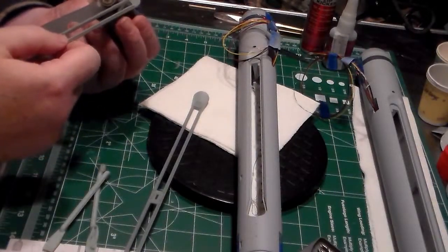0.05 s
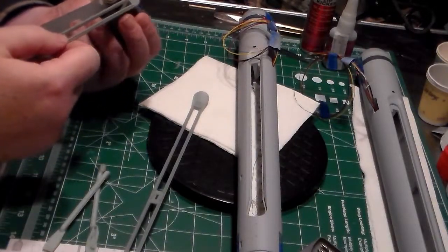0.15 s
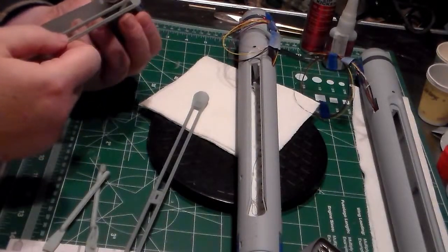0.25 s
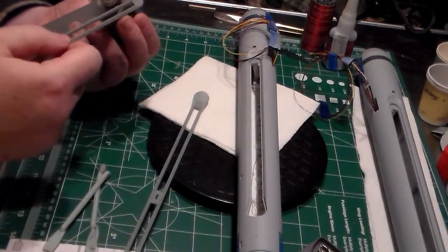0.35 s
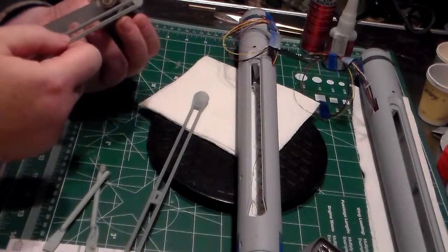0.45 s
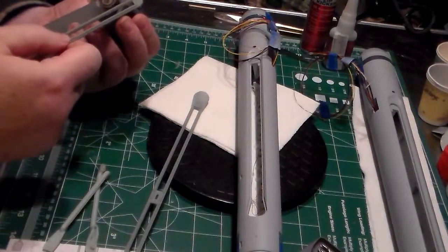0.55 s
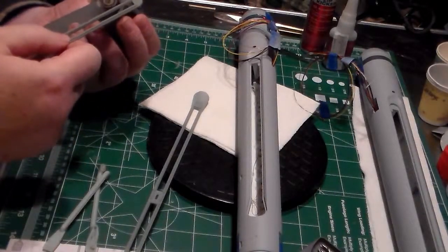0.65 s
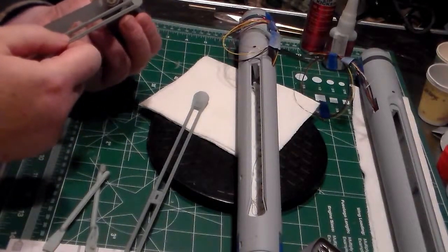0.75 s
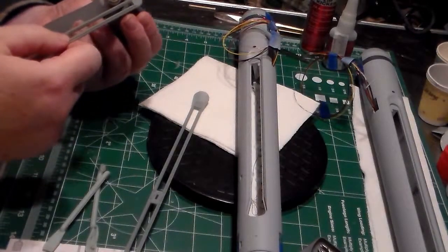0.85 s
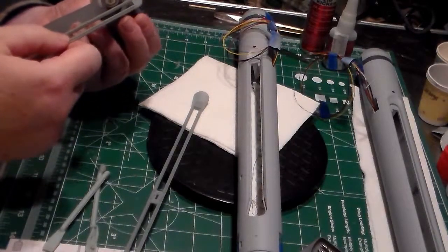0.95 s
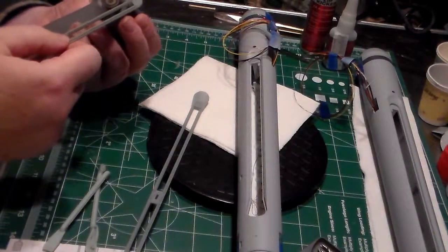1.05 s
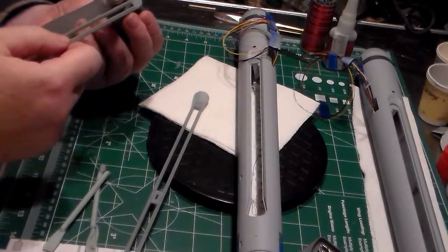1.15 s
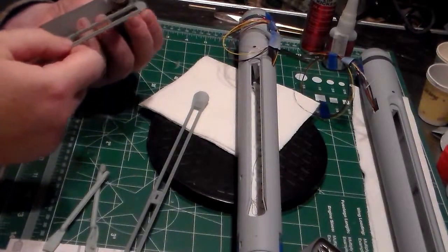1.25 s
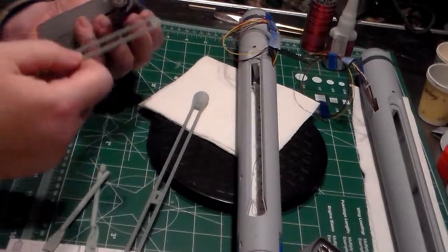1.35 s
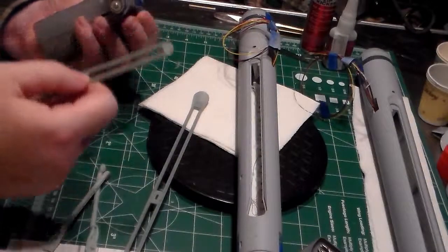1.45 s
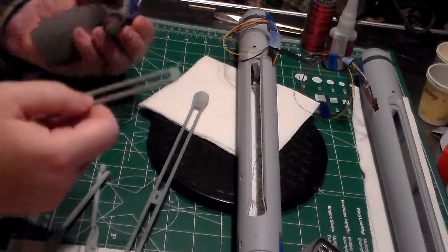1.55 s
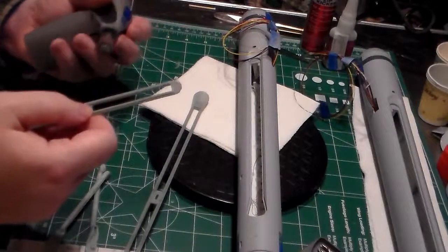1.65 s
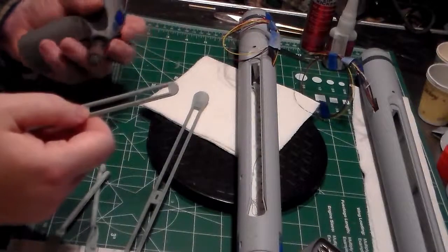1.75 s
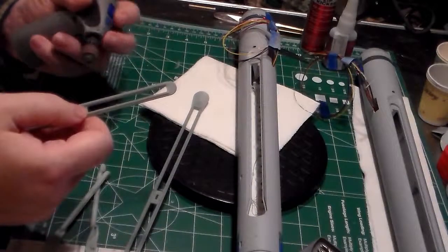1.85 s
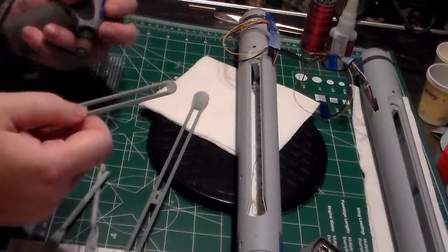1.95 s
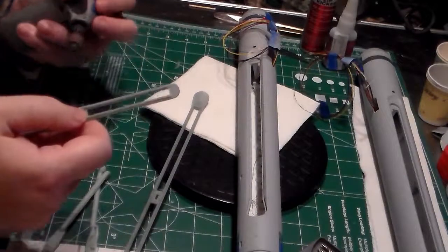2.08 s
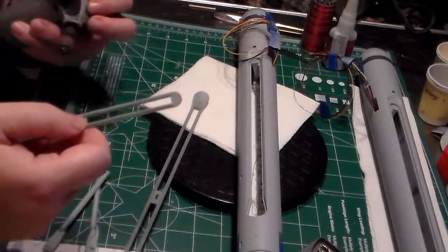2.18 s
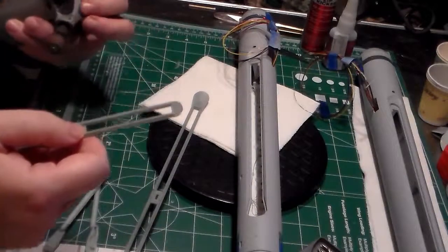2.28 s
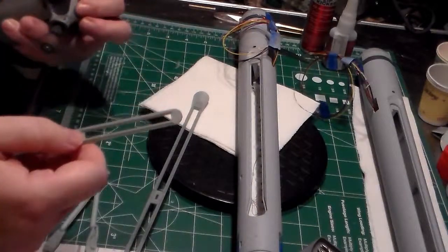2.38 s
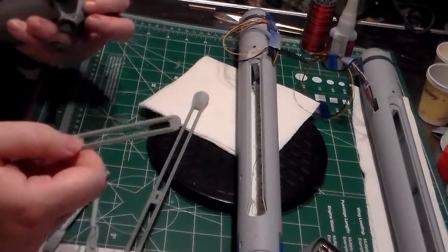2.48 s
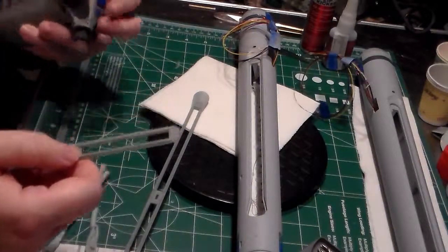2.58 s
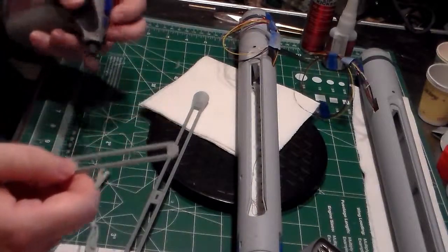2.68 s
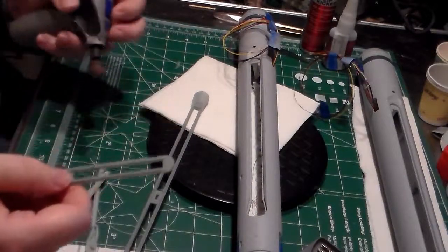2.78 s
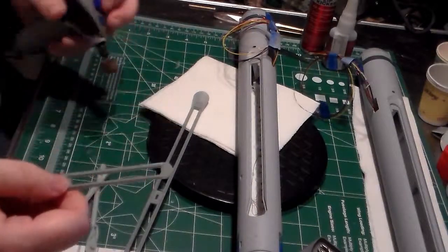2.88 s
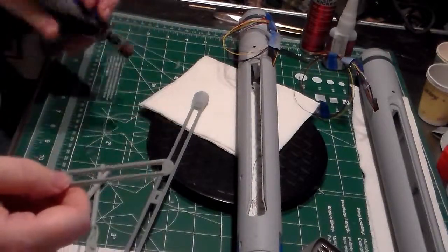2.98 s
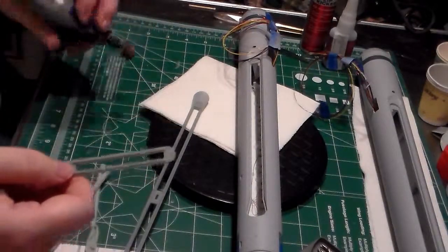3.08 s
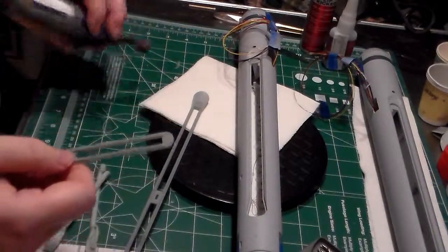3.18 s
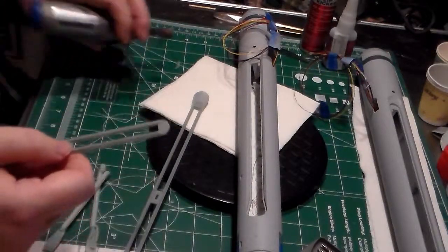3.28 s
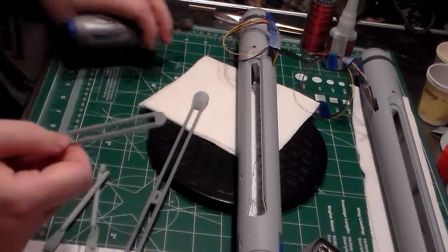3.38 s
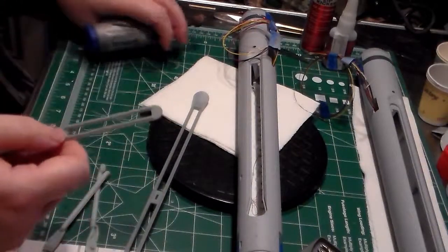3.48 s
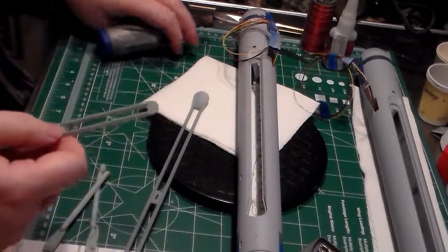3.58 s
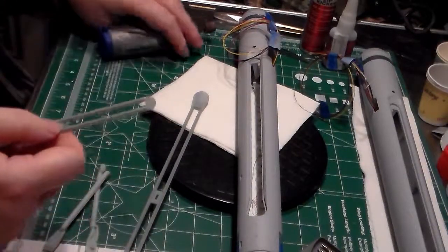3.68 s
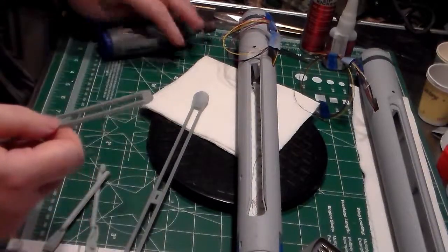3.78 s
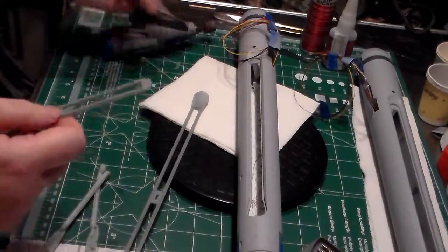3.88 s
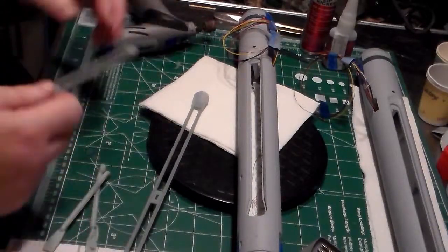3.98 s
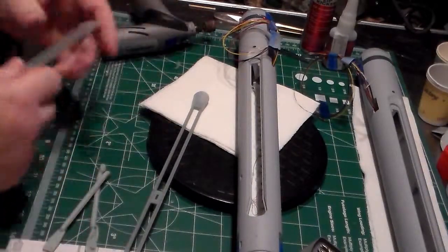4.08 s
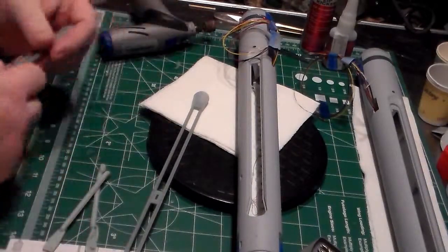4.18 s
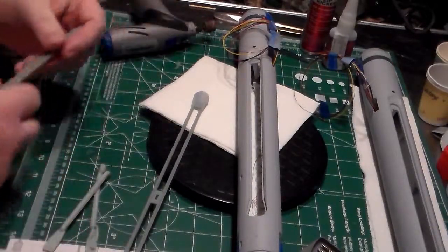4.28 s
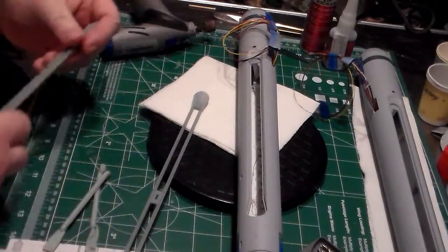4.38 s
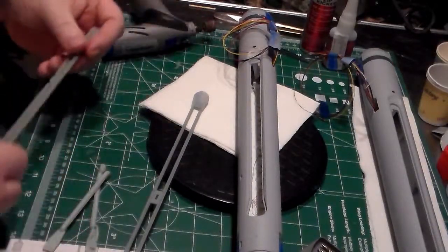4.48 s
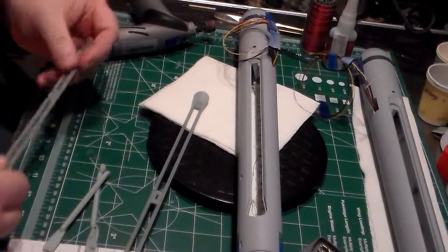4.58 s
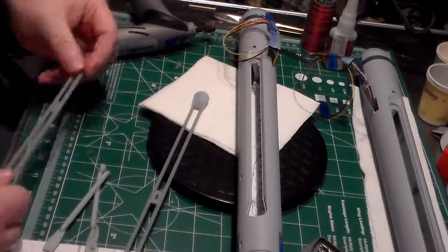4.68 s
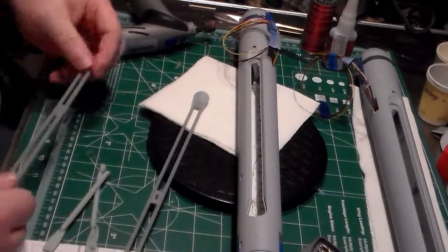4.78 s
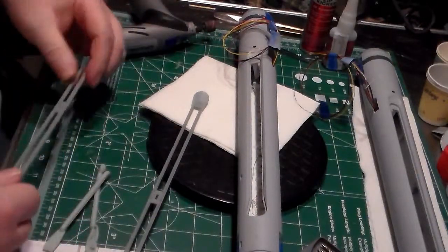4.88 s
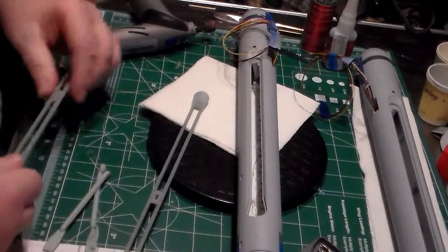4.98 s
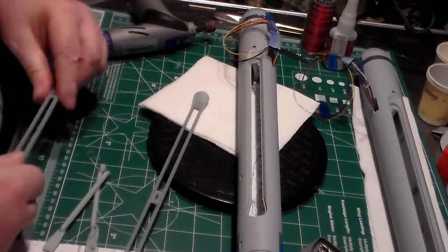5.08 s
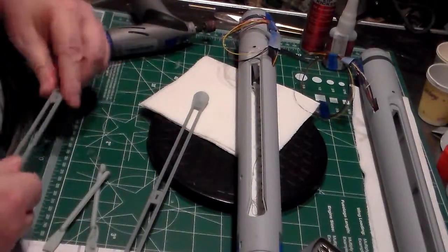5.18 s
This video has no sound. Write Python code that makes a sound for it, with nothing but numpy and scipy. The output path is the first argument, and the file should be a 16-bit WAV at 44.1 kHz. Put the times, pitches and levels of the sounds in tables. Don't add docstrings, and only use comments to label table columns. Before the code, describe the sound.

High electric rotary-tool whine with brief buzzing touches on plastic, a falling spin-down, a rattling set-down, and faint finger brushing in a quiet room.

```python
import sys
import numpy as np
from scipy import signal
from scipy.io import wavfile

SR = 44100
rng = np.random.default_rng(int(sys.argv[2]) if len(sys.argv) > 2 else 0)


def transcribe(u):
    v = np.clip(np.atleast_2d(u).T, -1, 1)
    q = np.round(v * 32767).astype(np.int16)
    wavfile.write(sys.argv[1], SR, q)


def magnitude_from_level(level_db):
    exponent = np.asarray(level_db, float) / 20
    return 10 ** exponent


N = 231341
RUNS = int(3.1 * SR)
FREE_HZ = 209.5
OFF_S = 2.421

# start t/s, length t/s, level/dB, shaft speed lost f/Hz
GRAZES = [
    (0.102, 0.32, -70, -0.5),
    (0.238, 0.046, -34.5, 1.44),
    (0.874, 0.073, -32, 2.0),
    (0.945, 0.072, -31.5, 1.5),
    (1.213, .11, -33.5, 3),
]
# t/s, case blow level/dB, bench thud level/dB, rattle level/dB, rattle T60 t/s
SET_DOWN = [(3.611, -31, -31, -38.5, 0.11), (3.638, -37, -47, -55, 0.091), (3.667, -38, -46, -66, 0.045),
            (3.694, -42, -44, -65, .05), (3.663, -44, -43, -51.5, 0.65), (3.753, -45, -46, -62, 0.16),
            (3.792, -42, -37, -68, 0.27), (3.8630, -19, -12, -65, 0.092),
            (3.8664, -17.5, -18, -43.5, 0.094), (3.876, -37, -13.5, -54, 0.05),
            (3.888, -48, -28, -72, 0.052), (3.893, -41, -19, -77, 0.12), (3.9718, -42, -38, -61, 0.033),
            (3.9929, -50, -55, -68, 0.035), (4.003, -52, -53, -72, .04), (4.294, -58, -46, -84, .03),
            (4.59, -44, -54, -76, 0.02)]
# f/Hz, likeness 0-1
TOOL_ALIKE = [(60, 0.68), (150, 0.61), (370, 0.71), (910, 0.64), (2260, 1), (5600, 0.43), (13900, 0.42)]
# f/Hz, level/dB
LEAN = [(60, -1.5), (130, -2.5), (280, -4), (620, -1.5), (1350, 2), (2930, -1.5), (5000, -2.5), (7000, 2.5),
        (10000, -2), (13900, 0.5)]


def rms_one(x):
    return x / np.sqrt(np.mean(x ** 2) + 1e-20)


def in_time(rows):
    s, *columns = np.transpose(rows)
    return [np.interp(np.arange(N) / SR, s, c) for c in columns]


def at_hz(points, hz):
    points = np.array(points)
    return np.interp(np.log(hz), np.log(points[:, 0] + 1e-9), points[:, 1])


def bell(x, centre, width):
    return np.exp(-((x - centre) / width) ** 2)


def stroke(s, length, rise, fall):
    along = (np.arange(N) / SR - s) / length
    return np.clip(np.minimum(along / rise, (1 - along) / fall), 0, 1)


def drift(rate, size=N):
    r = np.exp(-80 * np.pi * rate / SR)
    white = rng.standard_normal(size // 40 + 2002)
    slow = signal.lfilter([1], [1, -2 * r, r * r], white)[2000:]
    return np.interp(np.arange(size) / 40, np.arange(len(slow)), rms_one(slow - slow.mean()))


def ring(clicks, hz, t60):
    r, w = magnitude_from_level(-60 / (t60 * SR)), 2 * np.pi * hz / SR
    return signal.lfilter([0, np.sin(w)], [1, -2 * r * np.cos(w), r * r], clicks + 1e-18)


def soft(clicks, hz):
    return signal.sosfilt(signal.butter(2, hz, fs=SR, output="sos"), clicks + 1e-18)


def bands(alike, low_hz, count, size=N):
    edges = np.geomspace(low_hz, 15000, count)
    white = rng.standard_normal((2, 2, size))
    for k, (low, high) in enumerate(zip(edges, edges[1:])):
        centre = np.sqrt(low * high)
        band_pass = signal.butter(2, [low, high], "band", fs=SR, output="sos")
        mid, side = signal.sosfilt(band_pass, white[k % 2])
        c = np.clip(at_hz(alike, centre), 0, 1)
        yield centre, np.sqrt(1 + c) * mid + np.sqrt(1 - c) * side * [[1], [-1]]


def tone(cycles, hz, level_db):
    start = rng.uniform(0, 2 * np.pi)
    lag = np.sign(rng.normal(0, 1)) * 0.61 * min(hz / 8000, 1) ** 2
    lag = lag * (1 + 0.7 * np.sin(2 * np.pi * 0.7 * cycles / hz + 3 * start))
    lean = at_hz(LEAN, hz) / 2
    wave = np.sin(2 * np.pi * cycles + start + np.array([lag, -lag]))
    return np.sqrt(2) * magnitude_from_level(level_db) * magnitude_from_level(np.array([[lean], [-lean]])) * wave


def room_tone():
    # f/Hz, level/dB per Hz
    room = [(20, -5.5), (45, -1.5), (75, -8.5), (100, -8), (200, -13.5), (400, -13), (700, -15.5),
            (1300, -16.5), (2500, -20), (5000, -23), (9000, -25.5), (14300, -26.5)]
    # f/Hz, left-right likeness 0-1
    room_alike = [(60, 0.12), (180, 0.11), (530, 0.41), (1570, 0.39), (4670, 0.071), (13900, 0.12)]
    # f/Hz, level/dB rms
    hum = [(29.8, -55.5), (59.8, -59.5), (119.6, -63.5), (180, -72), (240, -71), (300, -78.5), (480, -74),
           (540, -71.5), (660, -70), (899, -68.5)]
    air = 0
    for hz, band in bands(room_alike, 21.6, count=22):
        air = air + magnitude_from_level(at_hz(room, hz) + 2.5 * min(120 / hz, 1) * drift(1.07)) * band
    mains = sum(tone(hz * np.arange(N) / SR, hz, db + 0.45 * drift(2.2)) for hz, db in hum)
    return magnitude_from_level(-52.0) * rms_one(air) + mains


def shaft():
    recover_s, start_short_hz = 0.3, 3.5
    friction_hz, drag_s = 229, 1.165
    t = np.arange(N) / SR
    load = sum(lost * stroke(s, length, 0.5, 0.5) / (length * SR / 2) for s, length, _, lost in GRAZES)
    short = start_short_hz * np.exp(-t / recover_s)
    short = short + signal.lfilter([1], [1, -np.exp(-1 / (recover_s * SR))], load)
    free = (FREE_HZ + friction_hz) * np.exp(-np.maximum(t - OFF_S, 0) / drag_s) - friction_hz
    return np.maximum(free - short, 10)


def whine(turns, speed, level_db, side, short_hz):
    # multiple, level/dB
    side_on = [(1, -28), (2, -22), (3, -14.5), (4, -16), (5, -10.5), (6, -11), (7, -19), (8, -22), (9, -15),
               (10, -23), (11, -34), (12, -21.5), (13, -13.5), (14, -27), (15, 1.5), (16, -10), (17, -5),
               (18, -4), (19, -2.5), (20, -36), (21, -13.5), (22, -8), (23, -13.5), (24, -17)]
    tilted = [(1, -37.5), (2, -27), (3, -22.5), (4, -22.5), (5, -13), (6, -16), (7, -8.5), (8, -14),
              (9, -72), (10, -34), (11, -49), (12, -14), (13, -20), (14, -5.5), (15, -15.5), (16, -11.5),
              (17, -25), (18, -12.5), (19, -45), (20, -58), (21, -30.5), (22, -22.5), (23, -23), (24, -22)]
    end_on = [(1, -24), (2, -31.5), (3, -15.5), (4, -21.5), (5, -20), (6, -25), (7, -7.5), (8, -27), (9, 7),
              (10, 4), (11, -40), (12, -10.5), (13, -37), (14, -49), (15, -29), (16, -11.5), (17, -1),
              (18, 1), (19, -17), (20, -46), (21, -13.5), (22, -16), (23, -29), (24, -11.5)]
    # f/Hz, level/dB
    high_orders = [(5000, -27), (6300, -22), (7500, -31), (8600, -26), (9900, -22.5), (11500, -26),
                   (12500, -24), (14000, -23)]
    # multiple, side on level/dB, tilted level/dB, end on level/dB
    bold_orders = [(29, -23, -29, -22), (30, -13, -18.5, -21), (31, -20, -28, -32), (36, -21, -37, -31),
                   (40, -25, -20, -24), (42, -19, -30, -29), (43, -18, -29, -30), (46, -22, -15, -21),
                   (47, -18, -17, -8), (48, -31, -21, -19), (49, -10.5, -15.5, -23), (50, -21.5, -7.5, -23),
                   (51, -25, -24, -27), (54, -16, -40, -30), (57, -21, -21, -31)]
    # chopper multiple, shaft multiple, side on level/dB, end on level/dB
    chopped = [(1, -3, -28, -20.5), (1, -1, -23, -37), (1, 0, -11.5, -14), (1, 1, -18.5, -37),
               (1, 3, -21.5, -13), (1, 4, -59, -32), (1, 5, -13, -40), (2, -9, -50, -16), (1, 9, -79, -24),
               (1, 10, -13, -24), (1, 11, -35, -10), (1, 12, -14, -15), (2, -8, -22.5, -22),
               (2, -5, -15, -44), (2, -3, -21, -20), (2, 0, -16.5, -26), (2, 1, -53, -23), (2, 2, -51, -14),
               (2, 3, -41, -15), (2, 5, -14, -19), (-1, 23, -34, -32), (-1, 24, -38, -30),
               (-1, 25, -38, -25), (3, -4, -15, -48), (3, 0, -12, -29)]
    chopper_hz = 1511.4
    # multiple, t/s, length t/s,
    # level/dB
    beams = [(18, 1.98, 0.43, 4), (18, 2.36, 0.11, -2), (17, 4, .15, 10.5), (17, 2.36, .12, -1),
             (21, 2.39, 0.13, 9.5), (21, 1.49, .2, 5.5), (16, 1.6, 0.26, -2), (14, 1.86, 0.21, 7),
             (15, 1.8, 0.19, -2), (19, 1.4, 0.27, 1), (15, 0.6, 0.31, 2), (5, 1.24, 0.11, 1),
             (7, 1.71, 0.11, 2.5), (9, 2.316, 0.27, 13), (13, 2.2, .3, 6), (50, 2.6, 0.3, -1),
             (30, 0.49, 0.47, 2), (36, 1.46, .3, 10.5), (49, 1.97, 0.3, 12), (50, 0.38, .5, -9),
             (47, 0.64, 0.36, 8), (21, 1.13, 0.22, 2.5), (7, 2.1, 0.35, 0.5), (16, 0.83, 0.04, 1),
             (17, .895, 0.036, 13), (20, 1.3, .1, -4), (12, 2.36, 0.32, 2), (15, 0.26, 0.32, 1),
             (7, 1.8, 0.23, 2.5), (62, 0.8, .5, 12), (60, 2.1, .5, -2), (65, 2, 0.25, -9),
             (29, 1.57, 0.4, 10.5), (36, 0.72, .25, 5), (13, 1.262, 0.075, 9), (14, 1.262, .09, 14),
             (15, 1.27, 0.061, 3.5), (19, 0.25, 0.17, -8), (19, 1.35, .1, 6), (19, 1.9, .25, 15),
             (19, 2.1, .15, 8), (14, 0.68, .3, 8), (14, 1.8, .15, -6), (17, 1.8, .15, 4),
             (17, 2.14, 0.19, 7), (20, .55, .25, 10), (20, 1.45, .1, 6), (10, 2.43, 0.039, -15),
             (46, 1.59, 0.22, 8), (46, 1.96, 0.23, 8), (47, 1.93, .2, -12), (47, 1.0, 0.32, -5),
                  (50, 2.05, .12, -4), (50, 0.11, .12, -7.5), (50, 0.98, 0.18, -15), (57, 1.8, .3, 1),
                  (56, 1.97, .15, 12), (52, 2.37, 0.11, 0), (48, 0.45, 0.18, 6), (48, 0.95, .2, 16),
                  (48, 1.7, .2, -2), (51, 2.1, .2, 11), (51, 1.4, 0.33, 14), (55, 1.53, .12, 7.5),
                  (54, 1.4, 0.45, -6), (61, 2.38, .1, 5), (49, 2.2, 0.11, -8)]
    strained_order, strain_db_per_hz = 21, 4.0
    t = np.arange(RUNS) / SR

    def beam(order):
        passes = [row for row in beams if round(row[0]) == order]
        return sum(db * bell(t, s, length / 2) for _, s, length, db in passes)

    out = 0
    for (k, a), (_, b), (_, c) in zip(side_on, tilted, end_on):
        k = round(k)
        db = level_db + np.interp(side, [0, 1, 2], [a, b, c]) + 0.5 * drift(11.5, size=RUNS) + beam(k)
        if k == strained_order:
            db = db + strain_db_per_hz * np.minimum(short_hz, 2)
        out = out + tone(k * turns, k * speed, db)
    bold = {round(k): np.interp(side, [0, 1, 2], sides) for k, *sides in bold_orders}
    for k in range(25, 68):
        balance = bold.get(k, at_hz(high_orders, k * speed))
        out = out + tone(k * turns, k * speed, level_db + balance + beam(k) + 2.5 * drift(4, size=RUNS))
    powered = np.arange(RUNS) < OFF_S * SR
    for m, k, a, b in chopped:
        cycles = round(m) * chopper_hz * t + round(k) * turns
        db = level_db + a + (b - a) * side / 2 + 0.6 * drift(4.0, size=RUNS)
        out = out + powered * tone(cycles, m * chopper_hz + k * speed, db)
    return out


def whirr(turns, side, speed, slowed_db):
    # f/Hz, level/dB per Hz
    housing = [(250, -44), (500, -19.5), (900, -12.5), (1500, -10), (2100, -9.5), (2700, -3), (3400, -1.5),
               (4300, -3), (5300, -8.5), (6300, -8), (7800, -18), (10000, -9.5), (11500, -10), (14300, -29)]
    housing_end_on = [(250, -41), (500, -19), (1000, -16.5), (1500, -6), (2000, -6), (2500, -5.5),
                      (2900, -5), (3500, -3.5), (4100, -1.5), (5000, -8), (6300, -11), (7800, -15),
                      (10000, -6), (11500, -11), (14300, -23)]
    # f/Hz, width f/Hz, side on level/dB, end on level/dB
    shell_modes = [(1013, 140, -35, -18.5), (1460, 21, -30.5, -20), (2010, 8.8, -27.5, -19),
                   (2450, 470, -26.5, -15), (3390, 330, -21, -12.5), (3520, 130, -15, -13),
                   (9900, 140, -26, -30), (10200, 500, -22, -23)]
    shudder_db = 4.5 * bell(speed, 111, 9.6)
    drag_db = 1 * bell(speed, 62.4, 28)
    level_db = -33.5 + 1.46 * slowed_db + drag_db
    throb = 1 + 0.24 * np.cos(2 * np.pi * turns) + 0.17 * np.cos(4 * np.pi * turns)
    throb = throb + 0.22 * np.cos(12 * np.pi * turns)
    together = drift(18.0, size=RUNS)
    broad = 0
    for hz, band in bands(TOOL_ALIKE, 243.0, count=36, size=RUNS):
        db = at_hz(housing, hz) * (1 - side / 2) + at_hz(housing_end_on, hz) * side / 2
        db = db + at_hz(LEAN, hz) * np.array([[0.5], [-0.5]])
        db = db + (1.5 * together + shudder_db) * min(4500 / hz, 1) ** 1.4
        broad = broad + magnitude_from_level(db + 0.19 * drift(40, size=RUNS)) * band
    shell = 0
    for hz, width, a, b in shell_modes:
        db = a + (b - a) * np.minimum(side, 2.6) / 2
        shell = shell + magnitude_from_level(db) * rms_one(ring(rng.standard_normal(RUNS), hz, 3.2 / width))
    return magnitude_from_level(level_db) * throb * (rms_one(broad) + magnitude_from_level(shudder_db) * shell)


def sanding(turns):
    # f/Hz, width f/Hz, level/dB
    part = [(1030, 42, -18), (1460, 1600, -13), (2870, 470, -3), (3680, 360, 0.5), (4600, 780, -2),
            (6850, 3400, -1), (11800, 11000, -2.5)]
    # start t/s, length t/s, f/Hz, width f/Hz, level/dB rms
    sings = [
        (.1, .38, 2650, 85, -68),
        (0.243, 0.038, 3410, 300, -36),
        (0.878, 0.04, 3340, 400, -35),
        (0.958, 0.054, 2650, 150, -37),
        (1.215, 0.12, 2724, 160, -36),
        (1.232, 0.08, 1030, 89, -54),
        (0.906, 0.016, 1030, 120, -42.5),
    ]
    bite = np.exp(0.81 * np.cos(2 * np.pi * turns))
    grains = rng.random(N) < 6000 * bite / SR
    grit = grains * magnitude_from_level(2.0 * np.minimum(rng.exponential(1, N), 3)) * rng.choice([-1, 1], N)
    each_turn = np.diff(np.floor(turns), prepend=0)
    knock = soft(each_turn * magnitude_from_level(24 + 1.2 * rng.standard_normal(N)), 5000)
    touch = sum(magnitude_from_level(db) * stroke(s, length, 0.089, 0.29) for s, length, db, _ in GRAZES)
    body = 0
    for k, (hz, width, db) in enumerate(part):
        body = body + magnitude_from_level(db) * (-1) ** k * rms_one(ring(grit + knock, hz, 3.5 / width))
    arms = 0
    for s, length, hz, width, db in sings:
        song = rms_one(ring(1.2 * grit + knock, hz, 7.5 / width))
        arms = arms + magnitude_from_level(db) * stroke(s, length, 0.23, 0.29) * song
    return touch * rms_one(body) + arms


def walls(x):
    room_t60_s = 0.15
    t = np.arange(int(0.4 * SR)) / SR
    tail = rng.standard_normal((2, len(t))) * magnitude_from_level(-60 * t / room_t60_s) * (t > 0.004)
    return signal.fftconvolve(x[None], tail / np.sqrt(np.sum(tail[0] ** 2)), axes=1)[:, :N]


def vent():
    def rush(hz, t60):
        return rms_one(ring(ring(rng.standard_normal(N), hz, t60), hz, t60))

    slots = magnitude_from_level(-44) * stroke(1.78, 0.35, 0.2, 0.2) * rush(10000, 1.9 / 1200)
    outlet = magnitude_from_level(-37 + 0.8 * drift(14)) * stroke(1.88, 0.35, 0.2, 0.36) * rush(3530, 2.2 / 320)
    return slots + outlet


def swell(hz):
    # f/Hz, width f/Hz, level/dB
    ninth_swells = [(1800, 100, 10), (1455, 125, 21), (1220, 100, 6), (1015, 85, 21), (880, 70, 12),
                    (750, 80, 18)]
    return sum(db * bell(hz, top_hz, width) for top_hz, width, db in ninth_swells)


def coast(turns, speed, slowed_db):
    # multiple, level/dB under the third order
    coast_low = [(2, -25), (3, -1), (4, -10), (5, -8), (6, -17), (7, -4), (8, -6), (10, -3), (12, -10)]
    third_db = -47 + 4.3 * slowed_db
    ninth_db = -56 + 1.3 * slowed_db + swell(9 * speed)
    swell_share = 0.45
    low = 0
    for k, db in coast_low:
        k = round(k)
        db = third_db + db + swell_share * swell(k * speed) + 2.5 * drift(12, size=RUNS)
        low = low + tone(k * turns, 710, db)
    wobble = 0.045 * drift(50, size=RUNS)
    ninth = tone(9 * turns + wobble, 1200, ninth_db + 1.2 * drift(60, size=RUNS))
    free = np.interp(np.arange(RUNS) / SR, [2.41, 2.43], [0, 1])
    return free * (low + ninth)


def creaks():
    # t/s, f/Hz, level/dB, length t/s, ring T60 t/s
    squeaks = [(3.868, 2570, -41, .012, .008), (2.79, 1440, -49, 0.098, 0.017), (2.7, 1950, -47.5, .1, .03),
               (4.002, 3200, -53, .025, .006), (3.995, 1950, -60, 0.037, .015), (3.8, 1250, -51, .03, .01),
               (3.09, 330, -63, 0.14, 0.037), (3.638, 1600, -45, .03, .012),
               (3.67, 1750, -50, 0.022, 0.015), (3.152, 3700, -62, 0.12, .007),
               (3.262, 2300, -62.5, 0.13, 0.0058), (3.39, 3500, -63.5, 0.18, 0.011),
               (3.417, 1950, -56, 0.048, 0.011), (3.53, 1800, -62, 0.06, .007),
               (3.65, 6100, -52, 0.045, 0.0054), (3.646, 2650, -41, 0.038, 0.013),
               (4.6, 5130, -62, 0.025, .007), (4.591, 2100, -51.5, .006, .004),
               (4.95, 7050, -63.5, 0.12, .04), (4.96, 7400, -67, .06, .03), (5.116, 2400, -58, 0.055, .005)]
    t, out = np.arange(N) / SR, 0
    for s, hz, db, length, t60 in squeaks:
        squeak = rms_one(ring(rng.standard_normal(N), hz, t60))
        out = out + magnitude_from_level(db) * bell(t, s, length / 2) * squeak
    return out


def rubbing():
    rubs = [
        (3.29, 0.78, -58.5, 0),
        (3.98, 0.046, -48, 0.9),
        (4.758, 0.19, -55, 0.7),
        (4.878, 0.19, -56, 0.3),
        (5.01, 0.21, -58, 0),
    ]
    # f/Hz, level/dB per Hz
    skin = [(900, -7), (1800, 1), (2500, -7), (3400, -3.5), (5000, -6), (7200, -3), (10000, -5.5),
            (14300, -9)]
    touch = [magnitude_from_level(db) * stroke(s, length, 0.25, 0.36) for s, length, db, _ in rubs]
    bright = sum(row[3] * press for row, press in zip(rubs, touch)) / (sum(touch) + 1e-9)
    hiss = 0
    for hz, band in bands(TOOL_ALIKE, 830, count=12):
        hiss = hiss + magnitude_from_level(at_hz(skin, hz) + 1.7 * bright * np.log2(hz / 5000) + 1.0 * drift(2.8)) * band
    return sum(touch) * rms_one(hiss)


def clack():
    # f/Hz, level/dB, T60 t/s
    grip = [(1470, -36, 0.093), (1740, -20.5, 0.027), (1750, -23, 0.027), (5400, -52, 0.0087),
            (8550, -47, 0.0032), (2600, -26, .012), (3600, -37, 0.0054), (11500, -40, .002)]
    blow = np.arange(N) == round(SET_DOWN[0][0] * SR)
    return sum(magnitude_from_level(db) * ring(blow, hz, t60) for hz, db, t60 in grip)


def set_down():
    # f/Hz, level/dB, T60 t/s
    case = [(1192, -6.5, 0.025), (1320, -29, 0.025), (1560, -8.5, 0.024), (1820, 4.5, 0.0081),
            (1850, -12, 0.015), (2190, -30, 0.012), (2550, -2.5, 0.015), (3030, -4, 0.011),
            (3540, -3, 0.006), (4240, -7, 0.0063), (5200, -7.5, 0.0044), (6630, -11, 0.0052),
            (7200, -10, 0.003), (10000, -2.5, 0.0013)]
    # f/Hz, level/dB, T60 t/s
    bench = [(159.7, -11, 0.28), (194.4, -8.5, 0.3), (240, -9.5, 0.05), (316, -17, 0.17), (445, 4.5, 0.012),
             (558, -8.5, 0.062), (694, -6, 0.072), (975, -6, 0.025)]
    t, out = np.arange(N) / SR, 0
    rows = np.array(SET_DOWN)
    at = np.round(rows[:, 0] * SR).astype(int)
    shake = 0
    for s, _, _, db, t60 in SET_DOWN:
        shake = shake + magnitude_from_level(db - 60 * np.maximum(t - s, 0) / t60) * (t > s)
    # modes, blow column, share of the rattle, contact cutoff in Hz
    for modes, column, share, contact_hz in ((case, 1, 1, 12000), (bench, 2, 0.25, 900)):
        body = 0
        for hz, db, t60 in modes:
            clicks = share * shake * (rng.random(N) < 2500 / SR) * rng.normal(0, 1.55, N)
            late = at + rng.integers(0, 24, len(at))
            clicks[late] += magnitude_from_level(rows[:, column] - 14 + rng.normal(0, 1.5, len(at)))
            body = body + magnitude_from_level(db) * ring(clicks, hz, t60)
        out = out + soft(body, contact_hz)
    return signal.sosfilt(signal.butter(2, 130, "high", fs=SR, output="sos"), out)


def scene():
    # t/s, turn (0 side on, 1 tilted, 2 end on), whine level/dB
    turning = [
        (0, 0.27, -32.5),
        (.8, 0.13, -34),
        (1.0, 0.2, -33),
        (1.4, 0.35, -32),
        (1.6, 0.52, -31.5),
        (1.66, 0.56, -30.5),
        (1.75, 0.99, -29.5),
        (2.0, 1.53, -31.5),
        (2.25, 1.61, -32),
        (2.42, 1.63, -31),
    ]
    side, whine_db = in_time(turning)
    off = np.maximum(np.arange(N) / SR - OFF_S, 0)
    side = np.minimum(side + 8.4 * off, 4.4)
    whine_db = whine_db - 875 * off
    speed = shaft()
    turns = np.cumsum(speed + 0.15 * drift(29.0) * (off == 0)) / SR
    near = sanding(turns) + clack() + set_down() + creaks()
    out = near * magnitude_from_level(np.array([[-0.4], [0.4]])) + magnitude_from_level(-10.5) * walls(near) + rubbing() + room_tone()
    turns, side, speed = turns[:RUNS], side[:RUNS], speed[:RUNS]
    slowed_db = 20 * np.log10(speed / FREE_HZ)
    out[:, :RUNS] += whine(turns, 207, whine_db[:RUNS], side, FREE_HZ - speed)
    out[:, :RUNS] += coast(turns, speed, slowed_db)
    out[:, :RUNS] += whirr(turns, side, speed, slowed_db)
    return out + vent()


def roll_off(x):
    return signal.sosfilt(signal.butter(12, 14230, fs=SR, output="sos"), x)


def record(dry):
    top_cut = signal.ellip(16, 0.3, 85, 14190, fs=SR, output="sos")
    return roll_off(signal.sosfilt(top_cut, dry))


dry = scene()
out = record(dry)
transcribe(out)
```